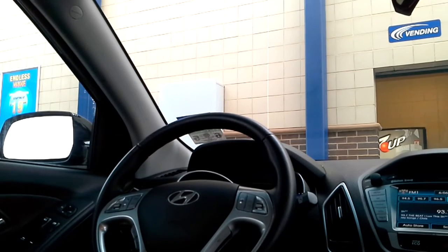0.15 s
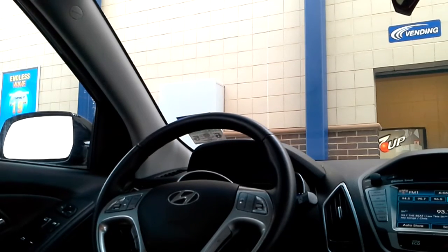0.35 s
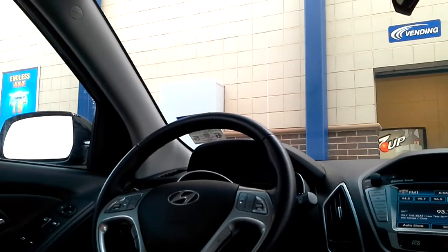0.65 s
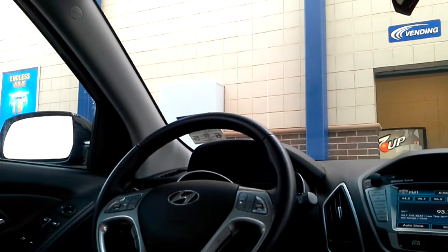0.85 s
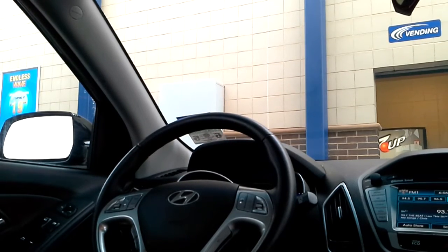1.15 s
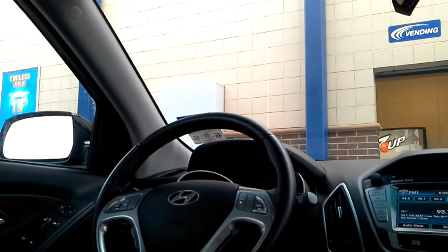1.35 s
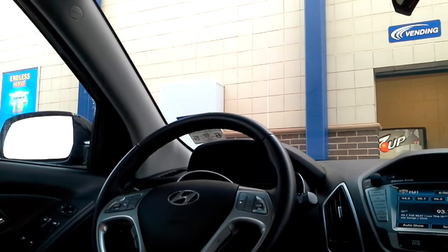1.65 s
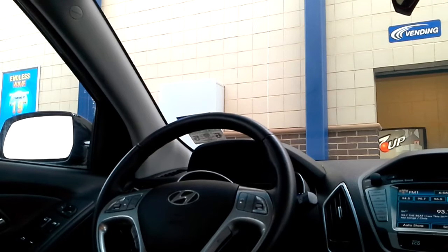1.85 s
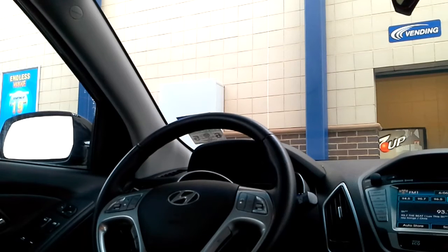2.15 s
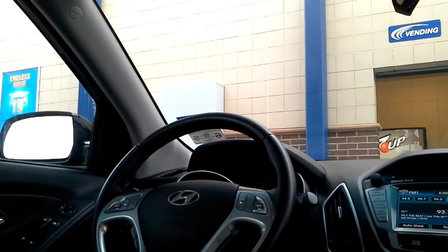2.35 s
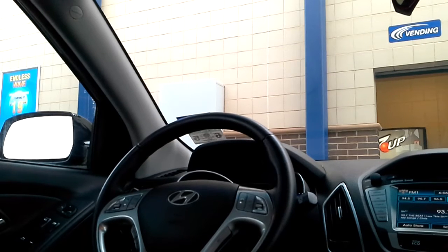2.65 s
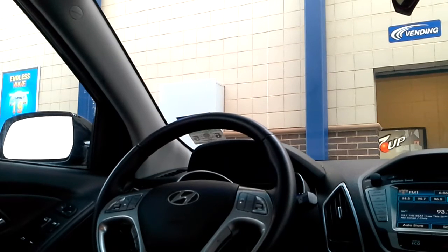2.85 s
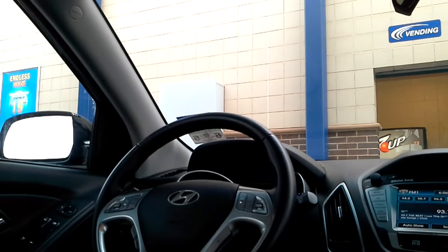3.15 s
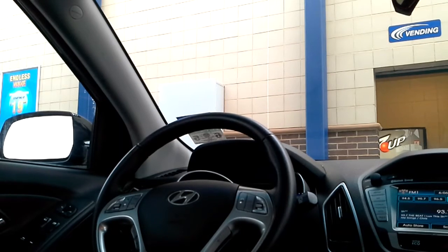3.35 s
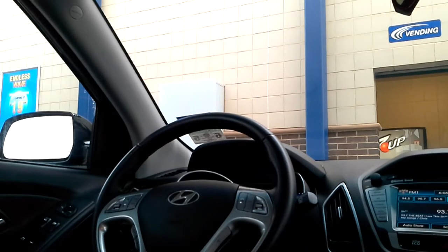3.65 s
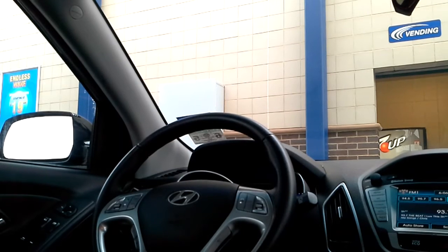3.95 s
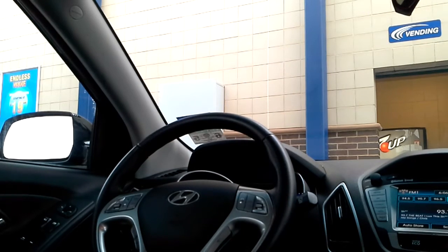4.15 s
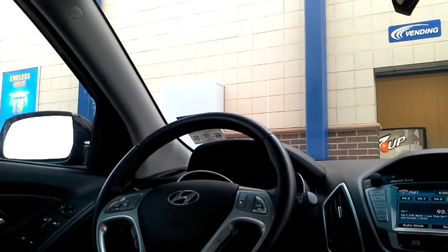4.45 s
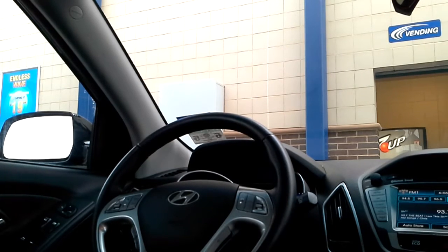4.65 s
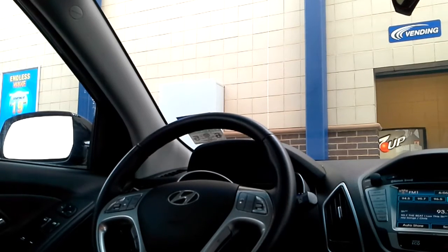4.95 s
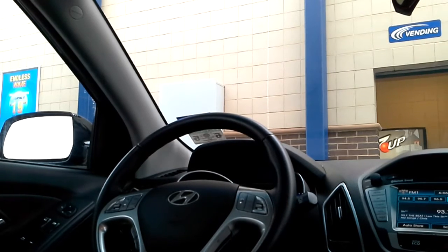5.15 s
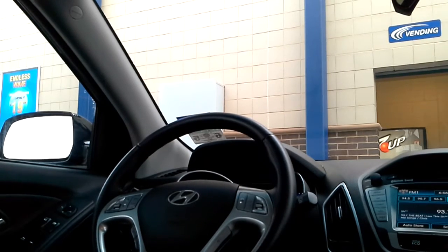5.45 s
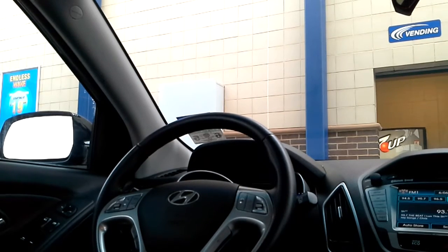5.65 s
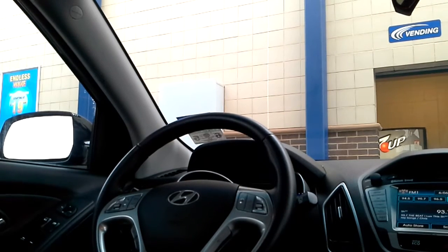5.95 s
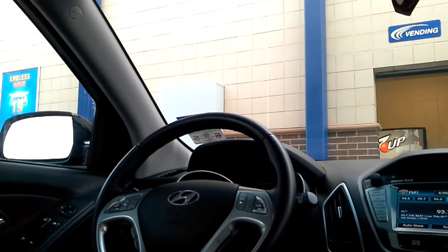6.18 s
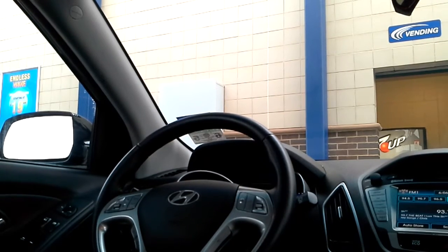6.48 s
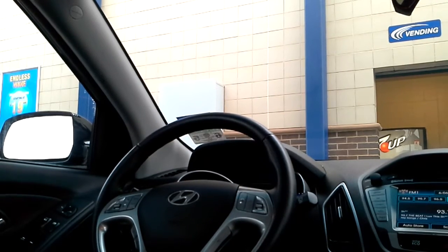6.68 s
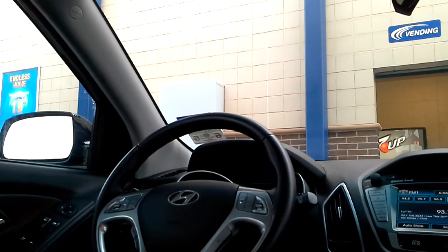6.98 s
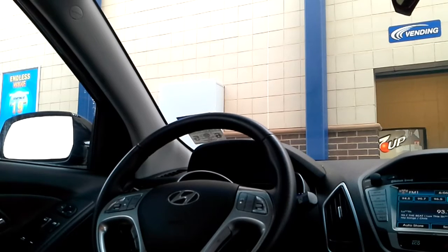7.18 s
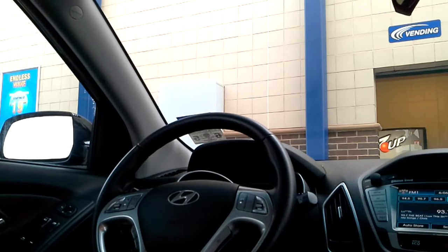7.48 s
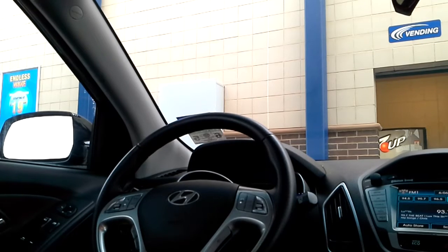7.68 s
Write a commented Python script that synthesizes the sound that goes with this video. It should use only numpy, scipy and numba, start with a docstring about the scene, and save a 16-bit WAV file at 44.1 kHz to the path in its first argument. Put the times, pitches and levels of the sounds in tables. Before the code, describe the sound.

A car wash blower blasts a parked car with loud, surging, hissing air and occasional hard knocks, heard from inside.

```python
"""A loud, surging rush of air is heard from the driver's seat as a vacuum nozzle is worked over a parked car.
The nozzle sings in a broad band; struck panels and hollows answer lower down, changing colour as the jet moves.
Each is turbulent noise shaped by resonance. Edges whistle and swish, and near reflections comb the sound. Now
and then something hard knocks on the trim and excites its damped modes. The loud moments overload a one-port
microphone."""
import sys
import numpy as np
from scipy import signal
from scipy.fft import rfft, irfft
from scipy.io import wavfile
from numba import njit

SR = 44100
rng = np.random.default_rng(int(sys.argv[2]) if len(sys.argv) > 2 else 0)


def bounce(signal):
    """Save signal as a 16-bit WAV file at the path given by the first command-line argument."""
    frames = np.transpose(np.atleast_2d(signal))
    limited = np.clip(frames, -1, 1)
    pcm = np.round(limited * 32767).astype(np.int16)
    wavfile.write(sys.argv[1], SR, pcm)


N = 344862

# strength of the blast on the car, dipping and surging as the jet turns: (t/s, level/dB)
BLAST_LEVEL = [(0, -11.5), (.04, -7), (.17, -11), (.2, -21), (.47, -22.5), (.495, -10), (.72, -13),
               (.91, -9.5), (1.33, -14), (1.39, -13), (1.74, -15), (1.76, -9.5), (2.105, -14.5), (2.12, -6),
               (2.24, -10), (2.265, -13.5), (2.33, -9), (2.41, -18), (2.52, -11.5), (2.6, -6),
               (2.72, -13.5), (3.11, -10), (3.25, -17), (3.28, -6.5), (3.35, -12.5), (3.55, -16),
               (3.59, -12.5), (3.63, -13), (3.79, -9.5), (3.83, -14), (3.99, -10), (4.33, -10.5),
               (4.38, -17), (4.42, -11.5), (4.51, -7.5), (4.62, -12), (5.57, -11), (5.62, -11), (5.75, -12),
               (5.8, -6.5), (5.86, -14.5), (6.01, -12), (6.08, -7.5), (6.15, -11.5), (6.49, -12.5),
               (6.51, -20), (6.58, -14), (6.7, -13), (6.712, -8), (6.8, -10), (7.67, -13.5), (7.75, -10),
               (7.82, -13)]
# where the jet lands, relative to the blast: (t/s, nozzle/dB, small hollows/dB, large hollows/dB)
LANDING_LEVELS = [(0, -2.5, -12.5, -8), (.7, 0.5, -9, -10), (1, -2.5, -8, -15), (1.32, 1, -8, -2),
                  (1.42, -1, -10, -13), (1.95, -1.5, -8.5, -8), (2.2, -2, -11, -13.5),
                  (2.75, -1.5, -7, -10), (3.1, -0.5, -10.5, -12), (3.5, 0, -2.5, -1.5),
                  (3.8, -0.5, -6, -11.5), (4.2, -2, -9, -10.5), (4.7, 0, -10, -14), (5.2, 0, -7.5, -12),
                  (5.45, -2, -7.5, -13.5), (5.62, -4.5, -4, -13), (5.9, -4, -9, -8.5),
                  (6.2, -0.5, -6, -12.5), (6.55, -2, -4.5, -2.5), (6.85, -4.5, -14.5, -17.5),
                  (7.2, -2, -10.5, -10), (7.55, -2.5, -3.5, -6.5), (7.82, -1.5, -10, -13.5)]
# treble hiss at mean blast level: (t/s, level/dB)
HISS_LEVEL = [(0, -22.5), (.55, -23.5), (.7, -27.5), (1.1, -31), (1.3, -22), (1.42, -19), (1.7, -17),
              (1.8, -35), (1.95, -25), (2.05, -17), (2.2, -26), (3.0, -24), (3.3, -22.5), (3.4, -29),
              (3.6, -23.5), (4.2, -29), (4.5, -25), (4.6, -37), (4.9, -22), (5.2, -22.5), (5.6, -28),
              (6.3, -22.5), (7.1, -26.5), (7.65, -21.5), (7.73, -17), (7.82, -15.5)]
# low noise in the cabin, before swells: (t/s, panel roar/dB, buffeting/dB)
CABIN_LEVELS = [(0.0, -24, -50), (0.35, -25.5, -39), (0.5, -27, -53), (0.72, -26, -62), (0.87, -26.5, -42),
                (1.24, -28, -48), (1.57, -25.5, -38), (1.83, -25, -46), (2.13, -24, -45), (2.55, -24, -35),
                (2.74, -31, -56), (2.98, -32.5, -49), (3.11, -28.5, -51), (3.48, -26.5, -41),
                (3.63, -28.5, -69), (3.85, -22.5, -59), (3.99, -30, -56), (4.6, -31, -47), (4.88, -33, -78),
                (5.1, -33.5, -87), (5.29, -33.5, -69), (5.46, -29, -44), (6.6, -29.5, -42.5),
                (6.88, -32.5, -55), (7.56, -26.5, -38), (7.82, -24.5, -48)]
# swells of roar and buffeting as the jet turns: (t/s, rise/dB)
CABIN_SWELLS = [(.24, 2), (1.718, 5), (2.6, 4), (3.24, 10), (3.881, 1.5), (4.381, 13), (4.53, 8),
                (5.27, 11.5), (6.009, 5), (6.72, 8.5), (7.71, 5)]
# spectra of the turbulent sources: (f/Hz, relative spectral density/dB)
NOZZLE_SPECTRUM = [(3300, -35), (3600, -10), (3950, -0.5), (4350, -0.5), (4900, -1), (5700, -10),
                   (7300, -19), (8500, -25)]
GAP_SPECTRUM = [(2500, -40), (2750, 0), (3200, 4), (3600, 2.5), (3900, -18)]
SMALL_HOLLOW_SPECTRUM = [(1600, -2), (1800, 1.5), (2250, 4.5), (2700, 1.5), (2950, -29)]
LARGE_HOLLOW_SPECTRUM = [(420, -22.5), (720, -8), (827, -10), (1090, -1), (1350, -5.5), (1900, -0.5),
                         (2470, -57), (4180, -120)]
HISS_SPECTRUM = [(6000, -1), (7200, -2.5), (9000, -4.5), (11200, -9), (13500, -5), (15500, -2)]
PANEL_SPECTRUM = [(88, -36), (160, -18.5), (280, -1), (345, -6.5), (548, -4), (715, -8.5), (800, -4.5),
                  (1040, -21), (1760, -120)]
BUFFET_SPECTRUM = [(15, -50), (25, -24), (49, -10), (170, 3), (220, -32), (370, -120)]
# near reflections off glass and dash: (delay/s, rms wander/s, gain/dB)
ECHO_PATHS = [(.0021, 0.00019, -12), (.0047, 0.00022, -19), (.0083, .0004, -14), (0.0143, 0.00054, -16)]
# the jet lingers on an edge: (start/s, end/s, f/Hz, bandwidth/Hz, level/dB)
EDGE_WHISTLES = [(0.581, 1.304, 3275, 161, -29), (.9, 1.38, 2210, 296, -19), (1.889, 1.986, 1210, 150, -13),
                 (2.74, 2.88, 2230, 150, -19.5), (2.895, 3.1, 3070, 180, -25),
                 (2.88, 3.313, 444, 72.6, -35), (4.617, 4.893, 3030, 150, -23),
                 (5.28, 5.906, 1004, 120, -27.5), (5.539, 5.71, 2270, 169.3, -10),
                 (6.6, 7.407, 1286, 131, -28.5), (6.713, 7.197, 4300, 250, -15),
                 (1.403, 1.75, 4306, 150, -19), (7.247, 7.597, 2210, 250, -22.5)]
# the jet crosses an edge: (centre t/s, half-length/s, start f/Hz, end f/Hz, level/dB)
EDGE_SWISHES = [(1.176, .05, 1690, 1870, -17), (3.095, 0.063, 1900, 2000, -17),
                (3.598, 0.04, 1820, 2050, -19), (5.795, 0.058, 1390, 2290, -22),
                (6.071, 0.06, 1600, 2840, -21), (6.445, 0.051, 1890, 2460, -17),
                (7.55, 0.091, 1050, 1190, -18)]
# knocks on the trim, before bass loss: (t/s, crack rms/dB, thump peak/dB, thump f/Hz,
# clack peak/dB, clack f/Hz, thump T60/s, air loss/dB)
TRIM_KNOCKS = [(1.738, -22, -1.5, 430, -1, 635, 0.054, -3.5), (2.113, -13, -4, 460, -5, 1250, 0.13, -4),
               (3.904, 0, 12, 275, 3, 750, 0.022, 6.5), (4.496, -4, -9.5, 347, -12, 1950, 0.076, -2),
               (5.284, -12, -6.5, 290, -0.5, 1130, 0.051, 5), (5.913, -3.5, -6.5, 284, -4, 885, 0.11, -5.5),
               (5.998, -2, -11, 288, 2.5, 1600, 0.17, 0), (6.487, -6.5, 1, 373, -1, 1220, 0.086, 6),
               (6.6, -9, -4, 574, 1, 1420, 0.11, 1.5), (6.708, -2, -4, 394, 0.5, 1360, 0.038, -3)]
# modes of the trim: (ratio to thump frequency, level/dB)
TRIM_MODES = [(.75, -10), (1, 3.5), (1.45, 3.5), (2.1, -26)]


def from_db(db):
    """Amplitude ratio of a level in decibels."""
    return 10 ** (np.asarray(db) / 20)


def unit_rms(x):
    """Normalisation to unit mean power."""
    return x / np.sqrt(np.mean(x ** 2) + 1e-20)


def curves(rows):
    """Linear interpolation of each level column, one value a sample."""
    times, *columns = np.transpose(rows)
    return [np.interp(np.arange(N) / SR, times, column) for column in columns]


def drift(rate_hz):
    """Slow random fluctuation: noise low-passed at rate_hz, rms 1."""
    step, settle = 40, 2000
    r = np.exp(-2 * np.pi * rate_hz * step / SR)
    slow = signal.lfilter([1], [1, -2 * r, r * r], rng.standard_normal(N // step + settle + 2))[settle:]
    return np.interp(np.arange(N) / step, np.arange(len(slow)), unit_rms(slow))


@njit
def moving_resonance(x, hz, width_hz, sr):
    """Forced response of a two-pole resonator whose centre follows hz."""
    out, r = np.zeros(len(x)), np.exp(-np.pi * width_hz / sr)
    for i in range(2, len(x)):
        feedback = 2 * r * np.cos(2 * np.pi * hz[i] / sr) * out[i - 1] - r * r * out[i - 2]
        out[i] = x[i] - x[i - 2] + feedback
    return out


def damped_mode(force, hz, t60):
    """A damped oscillator, whose free vibration falls 60 dB in t60 seconds."""
    r, w = from_db(-60 / (t60 * SR)), 2 * np.pi * hz / SR
    return signal.lfilter([0, np.sin(w)], [1, -2 * r * np.cos(w), r * r], force)


def turbulence(spectrum, flicker_db, rate_hz):
    """Turbulent noise: third-octave bands fluctuate partly together, partly alone; rms 1."""
    hz = np.fft.rfftfreq(N, 1 / SR) + 1
    point_hz, point_db = np.transpose(spectrum)
    colour = rfft(rng.standard_normal(N)) * from_db(np.interp(np.log(hz), np.log(point_hz), point_db))
    thirds = 3 * np.log2(hz)
    low, high = 3 * np.log2(point_hz[[0, -1]])
    out, together = 0, drift(rate_hz)
    for k in range(int(low), int(high) + 2):
        band = irfft(colour * np.cos(np.pi / 2 * np.clip(thirds - k, -1, 1)) ** 2, N)
        out += band * from_db(flicker_db * (.5 * together + drift(rate_hz)))
    return unit_rms(out)


def blown_opening(spectrum, hz, width_hz, ring_db, flicker_db):
    """Flow over an opening drives its resonance, adding a breathy band to a broad rush; rms 1."""
    rush = turbulence(spectrum, flicker_db, rate_hz=13.2)
    breath = moving_resonance(rng.standard_normal(N), hz, width_hz, SR)
    breath = unit_rms(moving_resonance(breath, hz, 2 * width_hz, SR))
    return unit_rms(rush + from_db(ring_db + flicker_db * drift(6)) * breath)


def jet(blast_db):
    """Turbulence sounds the nozzle, narrow gaps and hollows; larger cavities resonate lower."""
    nozzle_db, small_db, large_db = curves(LANDING_LEVELS)
    nozzle_hz = 4398 + 116 * drift(8.2)
    nozzle = blown_opening(NOZZLE_SPECTRUM, nozzle_hz, width_hz=170, ring_db=-6, flicker_db=1.5)
    gaps = from_db(-11) * turbulence(GAP_SPECTRUM, flicker_db=2.5, rate_hz=3.7)
    small_hz = 2287 + 108 * drift(7)
    small = blown_opening(SMALL_HOLLOW_SPECTRUM, small_hz, width_hz=220, ring_db=-4, flicker_db=1.4)
    large_hz = 1376 + 168 * drift(4)
    large = blown_opening(LARGE_HOLLOW_SPECTRUM, large_hz, width_hz=490, ring_db=-3, flicker_db=3)
    hollows = from_db(small_db) * small + from_db(large_db) * large
    return from_db(blast_db) * (from_db(nozzle_db) * nozzle + gaps + hollows)


def treble_hiss(blast_db):
    """High-frequency turbulence follows about half of the blast's swing in decibels."""
    hiss_db, = curves(HISS_LEVEL)
    swing_db = .53 * (blast_db - blast_db.mean())
    return from_db(hiss_db + swing_db) * turbulence(HISS_SPECTRUM, flicker_db=1.5, rate_hz=13)


def cabin_noise():
    """Forced vibration: the panels' roar and the deep buffeting swell together as the jet turns."""
    t = np.arange(N) / SR
    roar_db, buffet_db = curves(CABIN_LEVELS)
    swell_db = sum(rise_db * np.exp(-((t - centre) / .048) ** 2) for centre, rise_db in CABIN_SWELLS)
    roar = from_db(roar_db + swell_db) * turbulence(PANEL_SPECTRUM, flicker_db=3.5, rate_hz=5.2)
    buffet = from_db(buffet_db + swell_db) * turbulence(BUFFET_SPECTRUM, flicker_db=1, rate_hz=15)
    return roar, buffet


def reflections(direct):
    """Interference with short echoes, whose paths wander as the nozzle moves, forms a shifting comb."""
    out, power, samples = direct.copy(), 1, np.arange(N)
    for delay, wander, gain_db in ECHO_PATHS:
        lag = (delay + wander * drift(.41)) * SR
        out += from_db(gain_db) * np.interp(samples - lag, samples, direct)
        power += from_db(gain_db) ** 2
    return out / np.sqrt(power)


def whistles():
    """Edge tones: narrow resonance picks a breathy pitch out of the lingering jet's noise."""
    out, t = np.zeros(N), np.arange(N) / SR
    for start, end, hz, width_hz, level_db in EDGE_WHISTLES:
        t60 = np.log(1000) / (np.pi * width_hz)
        tone = damped_mode(rng.standard_normal(N), hz, t60)
        tone = unit_rms(damped_mode(tone, hz, t60 / 2))
        fade = np.clip(np.minimum(t - start, end - t) / .032, 0, 1)
        out += from_db(level_db + 3 * drift(14)) * tone * fade
    return out


def swishes(width_hz=310):
    """A noise-driven resonance glides upward, swelling and fading as the jet crosses an edge."""
    out = np.zeros(N)
    for centre, half_length, from_hz, to_hz, level_db in EDGE_SWISHES:
        along = np.linspace(0, 1, int(2 * half_length * SR))
        hz = from_hz + (to_hz - from_hz) * along
        noise = rng.standard_normal(SR // 4)[:len(along)]
        air = moving_resonance(noise, hz, width_hz, SR)
        air = unit_rms(moving_resonance(air, hz, 2 * width_hz, SR))
        at = int((centre - half_length) * SR)
        out[at:at + len(air)] += from_db(level_db) * air * np.sin(np.pi * along) ** 2
    return out


def choke():
    """Flow gain at each knock: air thins as the nozzle nears the surface; a negative loss is a surge."""
    t, loss_db = np.arange(N) / SR, np.zeros(N)
    for onset, *_, peak_loss_db in TRIM_KNOCKS:
        loss_db += peak_loss_db * np.exp(-np.abs(t - onset) / .02)
    return from_db(-loss_db)


def knocks():
    """Impact excitation: hard contact cracks and clacks, then a softer push sets the trim thumping."""
    out, t = np.zeros(N), np.arange(round(.15 * SR)) / SR
    push = np.exp(-((t - .003) / .0008) ** 2)
    for onset, crack_db, thump_db, thump_hz, clack_db, clack_hz, t60, _ in TRIM_KNOCKS:
        chatter = rng.standard_normal((2, len(t)))
        crack = unit_rms(damped_mode(chatter[0], hz=3900, t60=.0012)) * np.exp(-t / .006)
        clack = damped_mode(chatter[1] * np.exp(-t / .0061), clack_hz, t60=.01)
        thump = sum(from_db(db) * damped_mode(push, ratio * thump_hz, t60) for ratio, db in TRIM_MODES)
        hit = from_db(crack_db) * crack
        hit += from_db(clack_db) * clack / np.abs(clack).max()
        hit += from_db(thump_db) * thump / np.abs(thump).max()
        at = round(onset * SR)
        out[at:at + len(t)] += hit
    # small panels radiate little deep bass
    return signal.sosfilt(signal.butter(2, 190, "high", fs=SR, output="sos"), out + 1e-18)


def scene():
    """Superposition of air noise, cabin noise and knocks, the same in both channels."""
    blast_db, = curves(BLAST_LEVEL)
    air = jet(blast_db)
    hiss = treble_hiss(blast_db)
    roar, buffet = cabin_noise()
    combed = reflections(air + roar + whistles() + swishes())
    mix = choke() * (combed + hiss) + buffet + knocks()
    return np.array([mix, mix])


def record(dry):
    """Overload and band limiting: the microphone clips peaks, then deep bass and top treble are cut."""
    overload, mic_low_hz, mic_top_hz, cutoff_hz = .87, 100, 14750, 15600
    heard = np.clip(dry, -overload, overload)
    heard = signal.sosfilt(signal.butter(2, mic_low_hz, "high", fs=SR, output="sos"), heard)
    heard = signal.sosfilt(signal.cheby2(16, 35, mic_top_hz, fs=SR, output="sos"), heard)
    return signal.sosfilt(signal.cheby2(12, 60, cutoff_hz, fs=SR, output="sos"), heard)


dry = scene()
out = record(dry)
bounce(out)
```